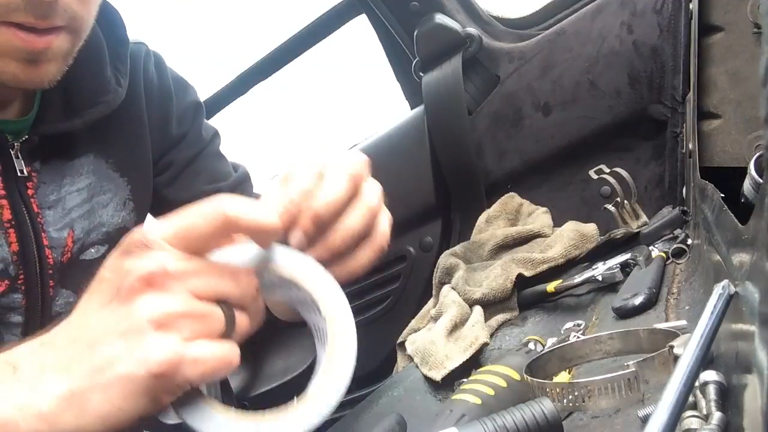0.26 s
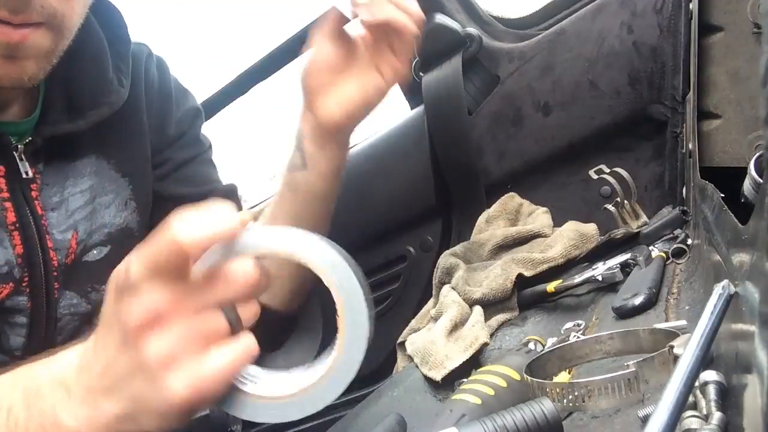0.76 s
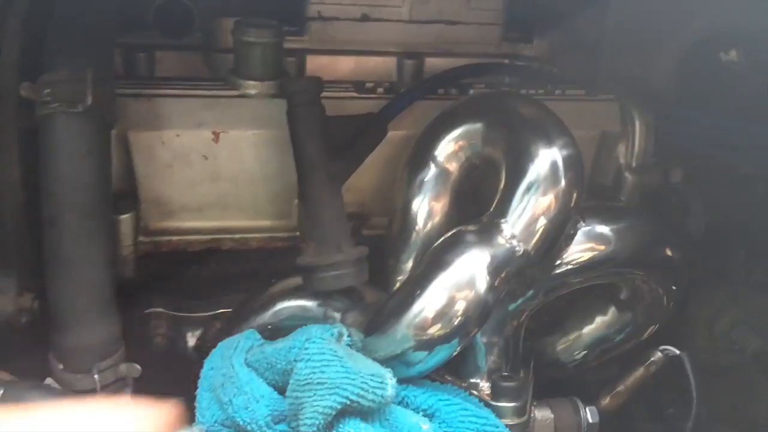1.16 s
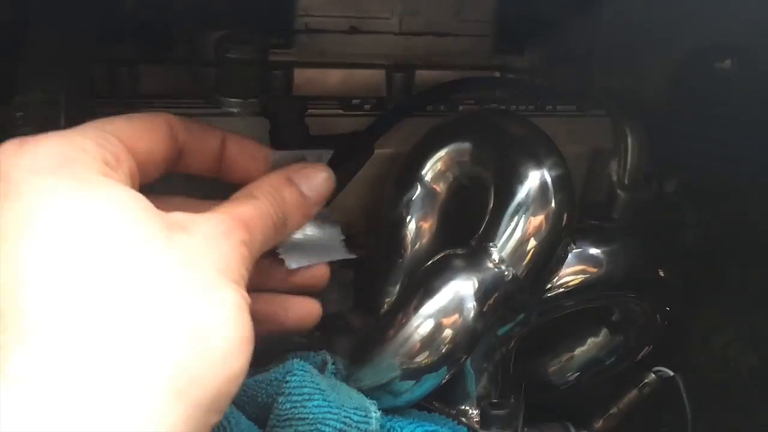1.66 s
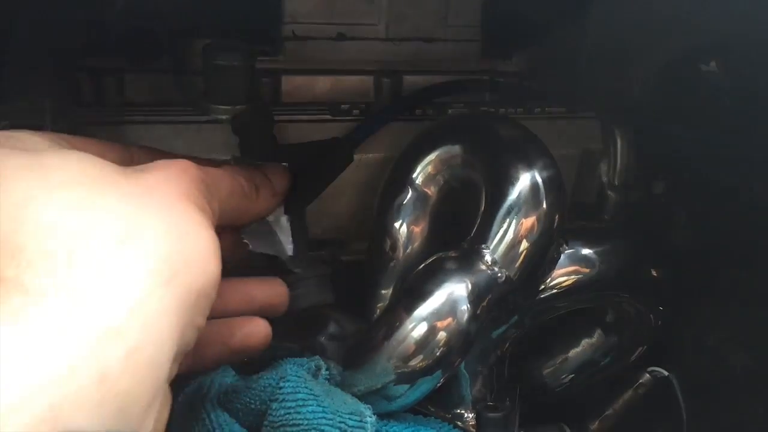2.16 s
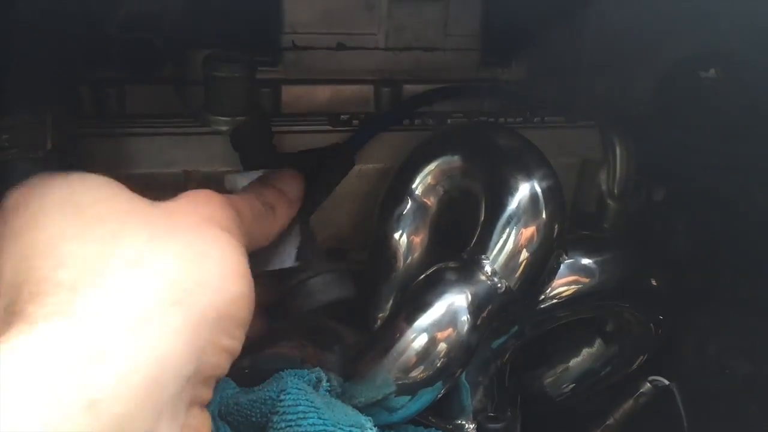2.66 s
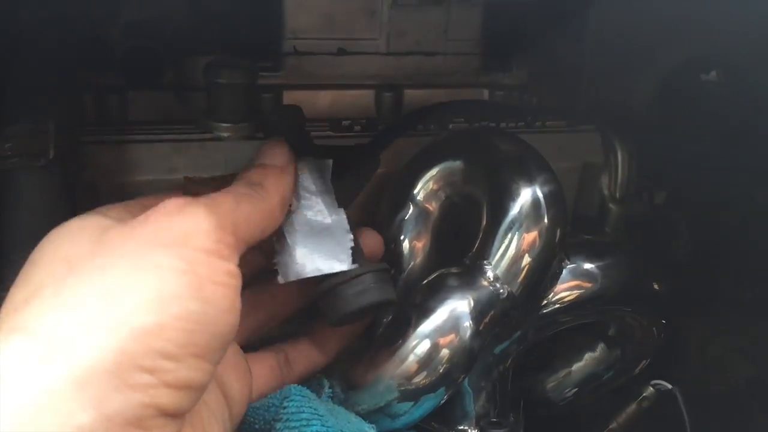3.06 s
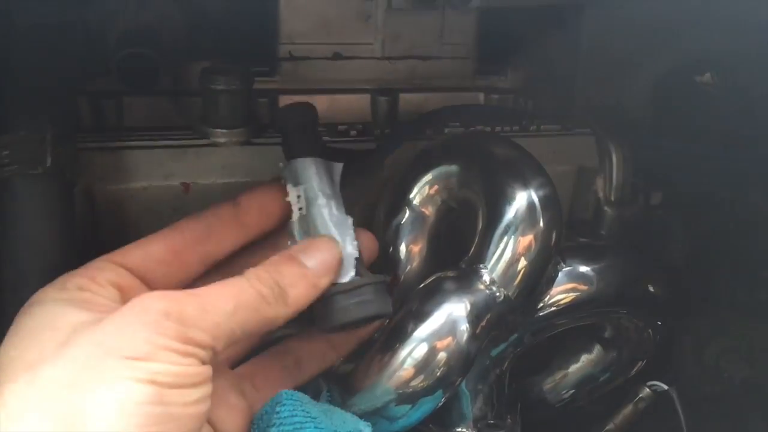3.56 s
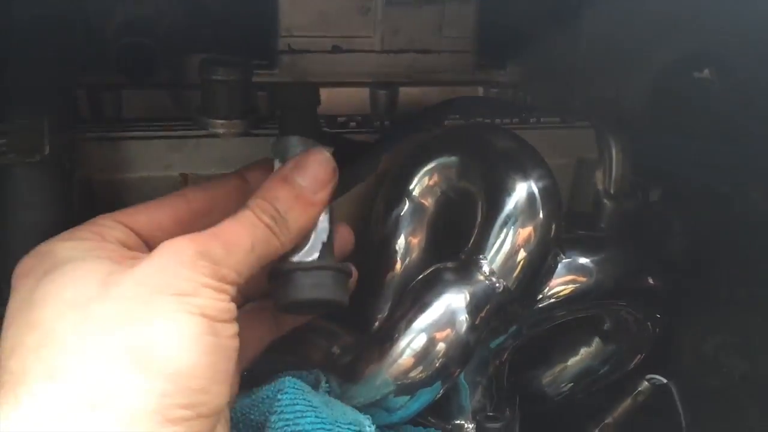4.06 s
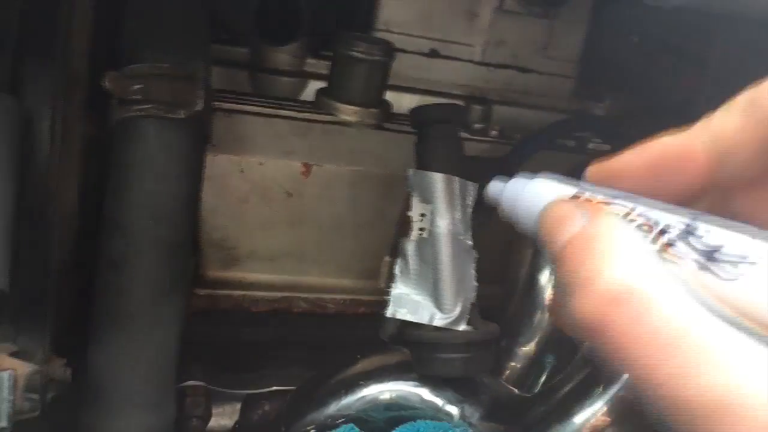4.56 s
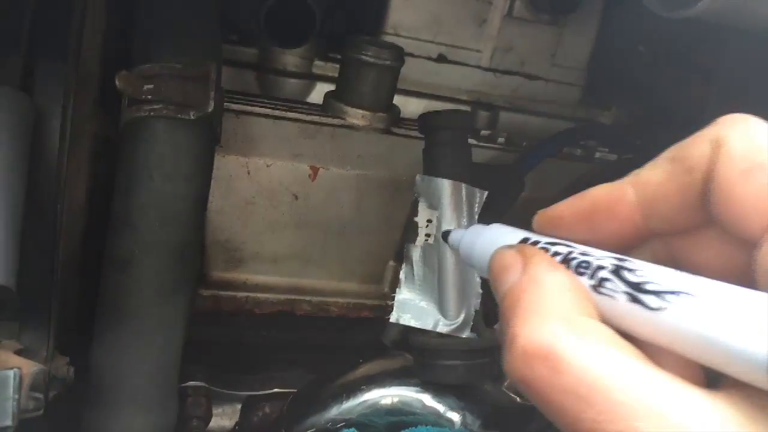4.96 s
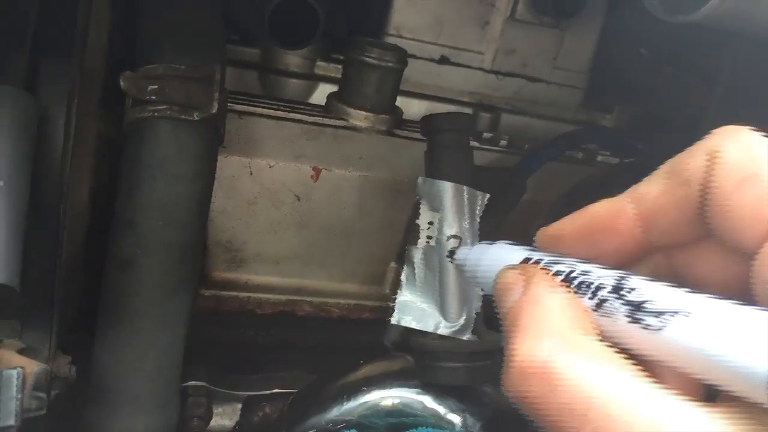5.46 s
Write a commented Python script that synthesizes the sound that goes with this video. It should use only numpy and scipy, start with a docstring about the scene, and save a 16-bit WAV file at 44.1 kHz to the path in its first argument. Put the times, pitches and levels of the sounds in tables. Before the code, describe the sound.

Cloth tape tears in one short rip, the roll thuds down, then faint sticky crackling and rubbing over a low hum.

```python
"""Inside a car, cloth tape is picked loose and torn across in one short rip, thread after thread.
The roll drops and the floor booms. Then, in the engine bay, the glue crackles as the strip is peeled
off the fingers, and the tape hisses as it is pressed on and rubbed flat. A rubber cap knocks on its
seat and a sleeve rustles. A low, lumpy hum and faint outdoor noise run underneath."""
import sys
import numpy as np
from scipy import signal
from scipy.fft import rfft, irfft
from scipy.io import wavfile
from scipy.ndimage import uniform_filter1d

SR = 44100
rng = np.random.default_rng(int(sys.argv[2]) if len(sys.argv) > 2 else 0)


def put_to_file(sound):
    """Save the sound as 16-bit audio at rate SR, in the file named by the first command-line argument."""
    columns = np.atleast_2d(sound).T  # one column per channel
    safe = np.clip(columns, -1, 1)
    whole_steps = np.round(safe * 32767)
    wavfile.write(sys.argv[1], SR, whole_steps.astype(np.int16))


N = 252156
TIME = np.arange(N) / SR
TEAR_START_S, TEAR_END_S = 0.5965, 0.6972

# the three ways the tape rings (flap, crack and fizz): f/Hz, width/Hz
TAPE_RINGS = [(1550, 1581), (4100, 2600), (12000, 3500)]
# the tone of a slap on the floor or a panel: f/Hz, level/dB
SLAP_TONE = [(300, -17.5), (700, 1.5), (1000, 3.5), (1600, -2), (2900, -4.5), (4500, -10.5), (8000, -14),
             (15000, -38.5)]
# how long sound lingers between close panels: f/Hz, time to fade by 60 dB/s
ECHO_FADE = [(300, 0.049), (2000, 0.047), (6000, 0.05), (14000, 0.035)]


def amp(db):
    """Turns decibels into a number to multiply by."""
    return 10 ** (np.asarray(db) / 20)


def unit(x):
    """Scales a sound to an average (rms) strength of 1."""
    return x / np.sqrt(np.mean(x ** 2) + 1e-20)


def read(points, hz):
    """Looks up values between rows of f/Hz, value, with every octave equally wide."""
    f, value = np.transpose(points)
    return np.interp(np.log(hz + 1), np.log(f + 1), value)


def level(rows):
    """Draws a volume curve through rows of t/s, level/dB."""
    return amp(np.interp(TIME, *np.transpose(rows)))


def swells(rows):
    """Adds up smooth bumps from rows of t/s, half length/s, height."""
    return sum(height * np.exp(-((TIME - s) / half) ** 2) for s, half, height in rows)


def add(mix, s, sound):
    """Mixes a sound in, starting at s seconds."""
    part = mix[max(round(s * SR), 0):][:len(sound)]
    part += sound[:len(part)]


def colour(x, points, tilt_db=0):
    """Gives a sound a tone, tilted by tilt_db per octave around 6 kHz, at strength 1."""
    hz = np.fft.rfftfreq(len(x), 1 / SR)
    octaves = np.log2(np.maximum(hz, 500) / 6000)
    return unit(irfft(rfft(x) * amp(read(points, hz) + tilt_db * octaves), len(x)))


def fade(x, fade_times):
    """Lets low and high pitches die away, each at its own speed."""
    hz, t, bands = signal.stft(x, SR, nperseg=128)
    bands *= amp(-60 * t / read(fade_times, hz)[:, None])
    return signal.istft(bands, SR, nperseg=128)[1][:len(x)]


def resonate(x, hz, width):
    """Keeps the part of a sound near one pitch, which may slide."""
    turn = np.exp(2j * np.pi * np.cumsum(hz * np.ones(len(x))) / SR)
    r = np.exp(-np.pi * width / SR)
    return 2 * (turn * signal.lfilter([(1 - r) ** 2], [1, -2 * r, r * r], x / turn)).real


def ring(notes, contact_s):
    """A blow builds over contact_s and sets notes ringing; each drops 60 dB in its fade time."""
    t = TIME[:SR // 3]
    swing = sum(amp(db - 60 * t / fade_s) * np.sin(2 * np.pi * hz * t) for hz, db, fade_s in notes)
    return swing * np.minimum(t / contact_s, 1)


def crackle(size, per_s, spread_db, hiss):
    """Tiny snaps of uneven size over a fine hiss."""
    sizes = amp(spread_db * np.minimum(rng.exponential(1, size), 3)) * rng.choice([-1, 1], size)
    clicks = sizes * (rng.random(size) < per_s / SR)
    return unit(clicks) + hiss * rng.standard_normal(size)


def snaps(rows, rings, gain_db, crack_db, splinter, splinter_s):
    """Each snap and its splinters make the tape ring; a bright snap has more fizz than flap."""
    out, t = np.zeros(N), TIME[:SR // 100]
    for s, snap_db, bright_db in rows:
        kick = splinter * rng.standard_normal(len(t)) * np.exp(-t / splinter_s)
        kick[0] += 1
        for (hz, width), db in zip(rings, (-bright_db, crack_db, bright_db)):
            ping = unit(resonate(kick, hz * rng.uniform(0.79, 1.164), width))
            add(out, s, amp(snap_db + db + gain_db) * ping)
    # something this small gives off no bass
    return signal.sosfilt(signal.butter(3, 750, "high", fs=SR, output="sos"), out)


def stroke(length_s, tilt_db, sizzle_db, per_s, spread_db, hiss, grip_db):
    """Skin and glue stick and slip with a wavering grip, which also makes the tight film sizzle."""
    # the tone of slipping on tape: f/Hz, level/dB
    slip_tone = [(350, -37.5), (600, -17.5), (1180, -10.5), (1760, -2), (2680, -1.5), (4090, -2),
                 (6310, -3.5), (6950, 1.5), (12300, -6.5), (15500, -4.5)]
    size = round(length_s * SR)
    grip = amp(grip_db * unit(uniform_filter1d(rng.standard_normal(size), SR // 250)))
    slips = crackle(size, per_s, spread_db, hiss) * grip
    sizzle = amp(sizzle_db) * unit(resonate(slips, hz=12300, width=4500))
    return (colour(slips, slip_tone, tilt_db) + sizzle) * signal.windows.tukey(size, .2)


def echoes(x, echo_db, gap_s):
    """Sound bounces off close panels in many echoes that die quickly."""
    t = TIME[:SR // 5]
    bounces = rng.choice([-1., 1.], len(t)) * (rng.random(len(t)) < 6000 / SR) * (t > gap_s)
    tail = fade(bounces, ECHO_FADE)
    return x + amp(echo_db) * signal.fftconvolve(x, tail / np.linalg.norm(tail))[:N]


def hum():
    """A low, lumpy hum, softer and slowly fading in the engine bay."""
    # the tone of the hum: f/Hz, level/dB
    hum_tone = [(18, -33), (33, -20), (62, -7), (73, 1), (82, 4), (97, 2.5), (112, -7.5), (165, -14.5),
                (195, -23.5), (228, -23), (255, -34.5), (300, -29), (400, -56.5)]
    # its swells and dips: t/s, half length/s, change/dB
    lumps = [(0.85, 0.16, -9.5), (1.92, 0.16, -4), (2.37, 0.08, 4), (2.75, 0.13, 6.5), (3.21, 0.039, 7.5),
             (3.41, 0.044, -7), (4.13, 0.072, 5.5), (4.82, 0.042, 7)]
    cabin_db, bay_db, bay_start_s, fall_db_per_s = -45.5, -49, 1.16, 1.01
    rumble = colour(rng.standard_normal(N), hum_tone)
    rumble /= np.sqrt(uniform_filter1d(rumble ** 2, SR // 6))  # evens out slow drift, keeps quick lumps
    hum_db = np.where(TIME < bay_start_s, cabin_db, bay_db - fall_db_per_s * (TIME - bay_start_s))
    return rumble * amp(uniform_filter1d(hum_db, SR // 20) + swells(lumps))


def open_air():
    """Distant outdoor noise; inside the cabin the glass keeps out much of its treble."""
    # the tone of the outdoors: f/Hz, level/dB
    air_tone = [(100, -2), (150, 14), (220, 7), (270, -1), (480, 0), (750, -5), (1400, -9.5), (2800, -18),
                (5600, -24), (10000, -29), (15500, -32)]
    # how it rises and falls: t/s, level/dB
    air_levels = [(0, -56), (.8, -65.5), (1.15, -57.5), (3.3, -61.5), (4.65, -59.5), (5.72, -62.5)]
    air = colour(rng.standard_normal(N), air_tone)
    muffled = signal.sosfiltfilt(signal.butter(1, 1800, fs=SR, output="sos"), air)
    treble = (air - muffled) * level([(1.11, -7), (1.16, 1)])
    return (muffled + treble) * level(air_levels)


def panel_bump():
    """A soft bump makes a cabin panel ring low, with a faint slap."""
    # the panel's notes: f/Hz, level/dB, fade time/s
    panel_notes = [(97.3, -9, 0.1), (169.6, -26.5, 0.23), (247, -32, 0.081), (439, -40.5, 0.072)]
    out = np.zeros(N)
    slap = fade(colour(rng.standard_normal(SR // 4), SLAP_TONE), ECHO_FADE)
    add(out, 0, amp(-40.5) * slap)
    add(out, .0065, ring(panel_notes, contact_s=0.0061))
    return out


def finger_rubs():
    """Fingers brush lightly over the tape; each stroke mostly hisses and is loudest in its middle."""
    # the strokes: start/s, end/s, level/dB, tilt/(dB per octave), sizzle/dB
    strokes = [(0.152, 0.208, -70.5, -5, -16), (1.022, 1.075, -70, 5, -6), (3.068, 3.112, -69, -2.5, -6),
               (3.188, 3.273, -70.5, -2.5, -1.5), (3.594, 3.683, -70.5, -2.5, -5),
               (3.858, 3.90, -73, -4, 0.5), (4.182, 4.338, -61, -6.5, -17.5)]
    out, softer_ends_db = np.zeros(N), 9.5
    for start, end, db, tilt_db, sizzle_db in strokes:
        rub = stroke(end - start, tilt_db, sizzle_db, per_s=990, spread_db=-1, hiss=0.94, grip_db=1.3)
        add(out, start, rub * amp(db - softer_ends_db * np.linspace(-1, 1, len(rub)) ** 2))
    return out


def backing_cracks():
    """The tape's backing cracks as it is picked loose, nicked and torn."""
    # the cracks: t/s, relative level/dB, brightness/dB
    cracks = [(0.1925, -63, -1.5), (0.2566, -57.5, -1), (0.265, -51.5, 2), (0.3564, -61.5, -0.5),
              (0.4188, -65, 1), (0.4332, -55, 1), (0.5451, -64, -6.5), (0.5555, -51, -5.5),
              (0.5761, -50, -7), (0.5795, -32, 2), (0.6009, -28.5, 4), (0.6092, -23.5, -0.5),
              (0.6267, -20.5, -1.5), (0.6353, -22, 1)]
    return snaps(cracks, TAPE_RINGS, gain_db=-6, crack_db=6, splinter=.25, splinter_s=0.0013)


def glue_peels():
    """Glue lets go in a coarse crackle that grows or dies away with the pull."""
    # the pulls: start/s, end/s, relative level/dB, growth/dB, tilt/(dB per octave), sizzle/dB
    pulls = [(0.262, 0.281, -59.5, -11, -2.5, -15), (0.301, 0.389, -68.5, 7, -2.5, -21),
             (0.431, 0.441, -50.5, -10, 6, -12), (0.582, 0.599, -34, -8, -1, -16),
             (0.919, 0.975, -72, 23, -0.5, -15.5), (1.191, 1.411, -67.5, 14.5, 1, -22),
             (1.406, 1.414, -41, 13, 1, -29), (2.296, 2.38, -65, 15, -1, -15.5),
             (2.369, 2.435, -43, -9.5, -1, -17.5), (2.523, 2.668, -65, -1, 1, -6.5),
             (2.692, 2.754, -71, 7, 5, 3.5), (2.778, 2.837, -57, 24, 0, 7.5),
             (3.5, 3.619, -69, 16, -1.5, -3.5)]
    out = np.zeros(N)
    for start, end, db, growth_db, tilt_db, sizzle_db in pulls:
        peel = stroke(end - start, tilt_db, sizzle_db, per_s=1100, spread_db=2.5, hiss=.36, grip_db=3.5)
        add(out, start, peel * amp(db + growth_db * np.linspace(-.5, .5, len(peel))))
    return amp(1) * out


def tear_pull(s):
    """The tear at time s: its force in dB (rise, hold, let go) and how far across it is (0 to 1)."""
    rise_s, rise_db, release_db_per_s = 0.024, 11.5, 1999.5
    risen = np.clip((s - TEAR_START_S) / rise_s, 0, 1)
    force_db = rise_db * (risen - 1) - release_db_per_s * np.maximum(s - TEAR_END_S, 0)
    return force_db, np.interp(s, [TEAR_START_S, TEAR_END_S], [0, 1])


def thread_breaks(count):
    """Evenly woven threads break in turn; gives rows of t/s, relative level/dB, brightness/dB."""
    first_s, gap_s, jitter_s = 0.5995, 0.0093, 0.0005
    lateness, strength = rng.standard_normal((count, 2)).T
    s = first_s + gap_s * np.arange(count) + jitter_s * lateness
    force_db, across = tear_pull(s)
    return np.transpose([s, -23 + 0.65 * force_db + 1.5 * strength, 0.5 + 3 * across])


def loose_flap(grains, breaks):
    """The crackle and each breaking thread shake the freed flap; it grows, so its note falls."""
    # hard tugs on the flap: t/s, relative level/dB
    hard_tugs = [(0.61, -26), (0.6348, -30), (0.6762, -28)]
    start_hz, end_hz, fall_s, tug_fade_s = 1450, 480, 0.025, 0.007
    jerks, tugs = np.zeros(N), np.zeros(N)
    for s, _, _ in breaks:
        add(jerks, s, np.ones(1))
    for s, db in hard_tugs:
        add(tugs, s, amp(db) * np.exp(-TIME[:SR // 40] / tug_fade_s))
    flap_hz = end_hz + (start_hz - end_hz) * np.exp(-np.maximum(TIME - TEAR_START_S, 0) / fall_s)
    return resonate(3 * grains + 70 * jerks, flap_hz, width=740) * (amp(-45) + tugs)


def tear():
    """Backing and glue crackle between the snapping threads, brighter as the tear crosses the tape."""
    # the tone of the ripping sheet: f/Hz, level/dB
    rip_tone = [(450, -32.5), (800, -9.5), (1300, -4.5), (1850, 5.5), (2450, -0.5), (3500, -5),
                (5300, -1.5), (6400, -5), (7800, 1), (9200, -6), (9950, -11), (11500, -5), (14500, -4.5),
                (15500, -9)]
    force_db, across = tear_pull(TIME)
    force = amp(force_db) * (TIME > TEAR_START_S)
    breaks = thread_breaks(count=11)
    grains = crackle(N, per_s=6500, spread_db=2, hiss=.25)
    sheet = colour(grains, rip_tone)
    low = signal.sosfiltfilt(signal.butter(2, 6000, fs=SR, output="sos"), sheet)
    brightness = amp(-1 + 7 * across)
    sheet = (low / brightness + (sheet - low) * brightness) * amp(-25)
    # the tear leaps ahead after each thread and slows against the next
    leaps = np.zeros(N)
    for s, _, _ in breaks:
        add(leaps, s, np.exp(-TIME[:SR // 40] / 0.0019))
    ticks = snaps(breaks, TAPE_RINGS, gain_db=-8, crack_db=-1, splinter=.25, splinter_s=0.0004)
    return force * (sheet * (0.68 + 1.9 * leaps) + loose_flap(grains, breaks)) + ticks


def roll_drop():
    """The roll slaps the floor, which booms; the roll's close notes throb into a second bump."""
    # the roll's notes: f/Hz, level/dB, fade time/s
    roll_notes = [(311.6, -32.5, 0.25), (372.6, -18.5, 0.18), (412, -7.5, 0.0832), (462, -7.5, 0.061),
                  (553, -23, 0.17), (650, -22.5, 0.0255), (934, -25, 0.0057), (1110, -14, 0.045),
                  (1650, -24.5, 0.064)]
    # the floor panel's notes: f/Hz, level/dB, fade time/s
    floor_notes = [(98.2, 0, 0.063), (152.2, -17, 0.1537)]
    # how long the slap lasts: f/Hz, fade time/s
    slap_fade = [(500, 0.12), (2000, 0.078), (6000, 0.06), (14000, 0.054)]
    out = np.zeros(N)
    add(out, 1.1103, -ring(roll_notes, contact_s=0.0024))
    add(out, 1.119, ring(floor_notes, contact_s=0.031))
    slap = fade(colour(rng.standard_normal(SR // 4), SLAP_TONE), slap_fade)
    add(out, 1.1122, amp(-20.5) * slap)
    # its edge brushes the carpet just before it lands
    brush = unit(resonate(rng.standard_normal(N), hz=550, width=250))
    out += brush * level([(1.08, -110), (1.096, -56), (1.11, -13.5), (1.112, -99), (1.116, -110)])
    return out * level([(1.158, 0), (1.165, -61)])  # the sound stops short


def sleeve_rustle():
    """A sleeve rustles as the arm shifts."""
    # the arm's moves: t/s, half length/s, level/dB
    moves = [(1.27, 0.15, -77.5), (2.956, 0.81, -71), (3.674, 0.19, -73.5), (4.597, 0.21, -67.5),
             (5.004, 0.3, -77)]
    # the tone of the cloth: f/Hz, level/dB
    cloth_tone = [(400, -11.5), (1200, 7), (3000, 1), (5000, -5.5), (9000, -13), (15000, -14)]
    rustle = colour(crackle(N, per_s=3200, spread_db=2.5, hiss=0.82), cloth_tone)
    return rustle * swells([(s, half, amp(db)) for s, half, db in moves])


def strip_snaps():
    """Glue snaps free of the fingers and the cap, making the short loose strip ring."""
    # the moments the glue lets go: t/s, relative level/dB, brightness/dB
    releases = [(1.2243, -60, 3.5), (1.357, -56, 4), (1.401, -49, -1), (1.4115, -41.5, 1.5),
                (2.3262, -56, 4), (2.3591, -49.5, 8), (2.3752, -43.5, 10), (2.3855, -44, 1),
                (2.3923, -40, 3), (2.3998, -44, 8), (2.41, -46, -1), (2.4247, -33, 0.5), (2.5921, -51, 10),
                (2.605, -48.5, 4), (2.6822, -66.5, 17.5), (2.7852, -64, 16), (2.811, -52, 15),
                (2.8293, -42, 7), (2.8552, -54, 3), (3.61, -53, 5), (4.1237, -60.5, 13)]
    # the strip's flap, crack and fizz: f/Hz, width/Hz
    strip_rings = [(1300, 770), (3700, 6500), (10000, 7400)]
    return snaps(releases, strip_rings, gain_db=-10.5, crack_db=-2.5, splinter=0.14, splinter_s=0.0015)


def cap_knock():
    """The rubber cap knocks on its seat: a light touch, then the full knock."""
    # the cap's notes: f/Hz, level/dB, fade time/s
    cap_notes = [(232.5, -31, 0.073), (296, -33.5, 0.073), (393, -47, 0.032), (546, -37.5, 0.097),
                 (713, -30.5, 0.036), (960, -40.5, 0.043)]
    out = np.zeros(N)
    add(out, 2.8525, amp(-5.5) * ring(cap_notes[:1], contact_s=0.00096))
    add(out, 2.868, ring(cap_notes, contact_s=0.0039))
    return out


def drone():
    """A higher drone joins the hum near the end."""
    start_s, rise_s = 4.14, 0.4
    tone = unit(resonate(rng.standard_normal(N), hz=150.5, width=67))
    return amp(-60) * tone * np.clip((TIME - start_s) / rise_s, 0, 1)


def scene():
    """Mixes the tape and its echoes, the knocks and the background into one channel."""
    backing, strip = backing_cracks(), strip_snaps()
    tearing = echoes(backing + tear(), echo_db=-4, gap_s=.0015)
    handling = echoes(strip + glue_peels() + finger_rubs(), echo_db=-8.5, gap_s=.0012)
    knocks = roll_drop() + panel_bump() + cap_knock()
    background = hum() + drone() + open_air() + sleeve_rustle()
    return (tearing + handling + knocks + background)[None]


def record(dry):
    """Cuts away the very highest treble."""
    top_hz = 15350
    treble_cut = signal.firwin(401, top_hz, window=("kaiser", 9), fs=SR)
    return signal.oaconvolve(dry, treble_cut[None], "same")


dry = scene()
out = record(dry)
put_to_file(out)
```